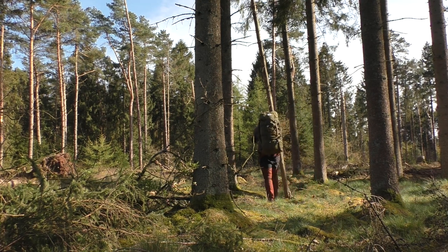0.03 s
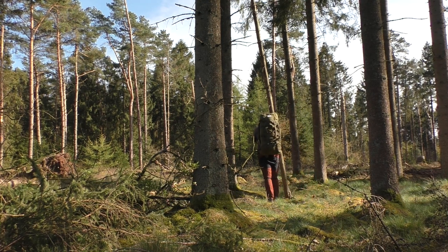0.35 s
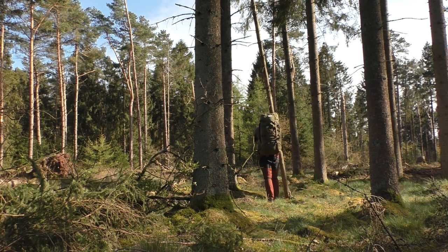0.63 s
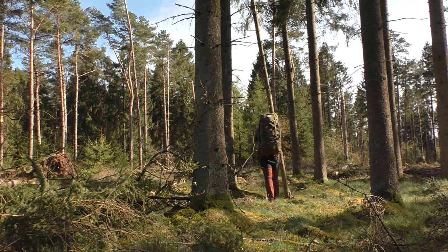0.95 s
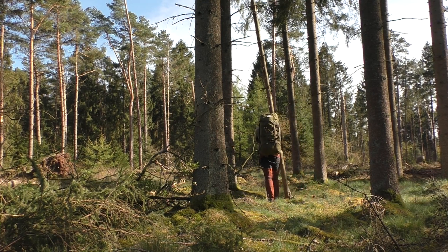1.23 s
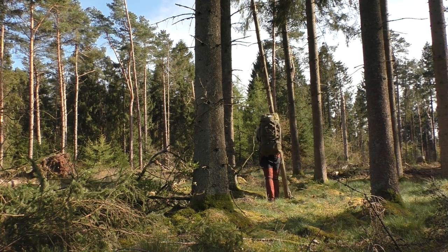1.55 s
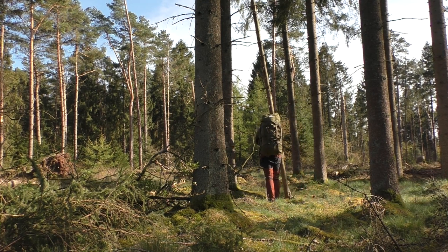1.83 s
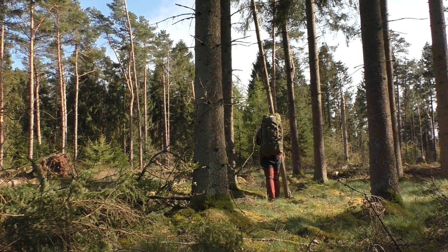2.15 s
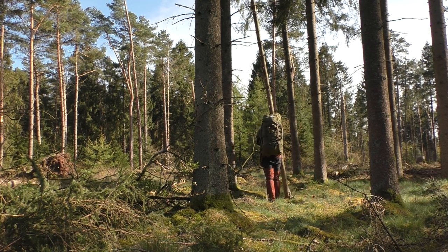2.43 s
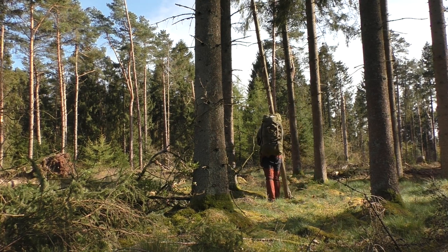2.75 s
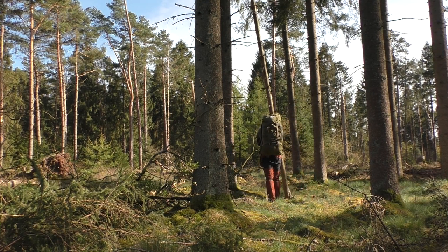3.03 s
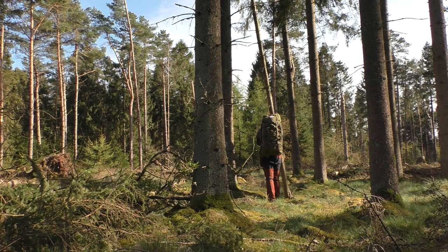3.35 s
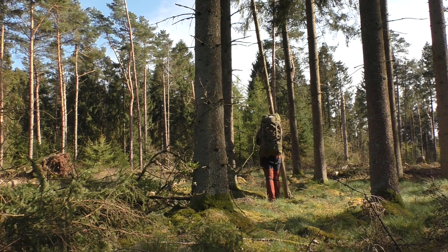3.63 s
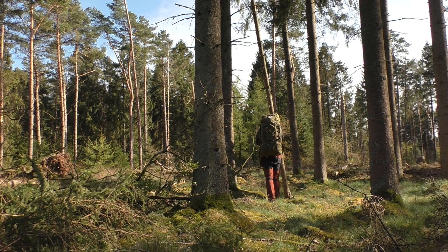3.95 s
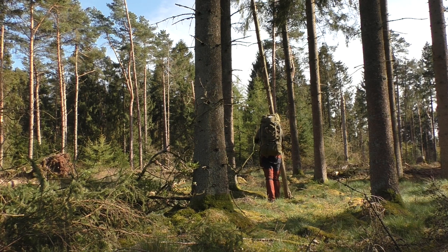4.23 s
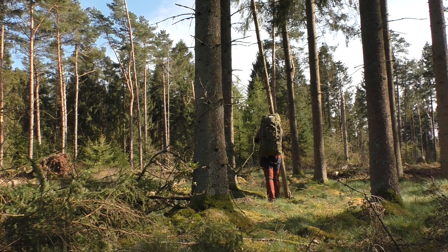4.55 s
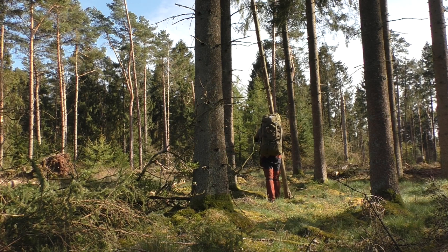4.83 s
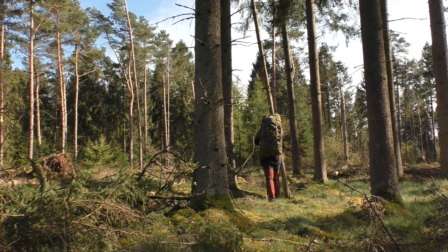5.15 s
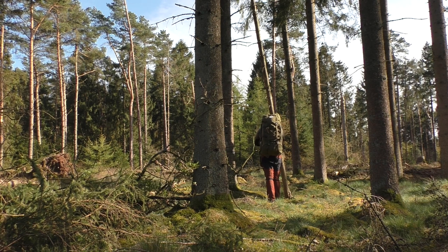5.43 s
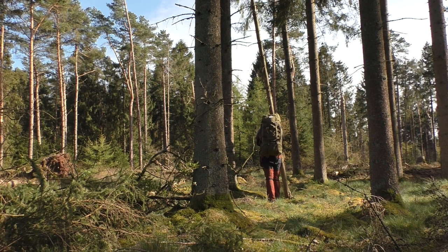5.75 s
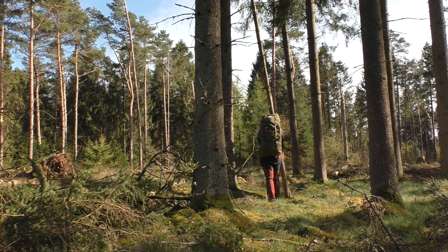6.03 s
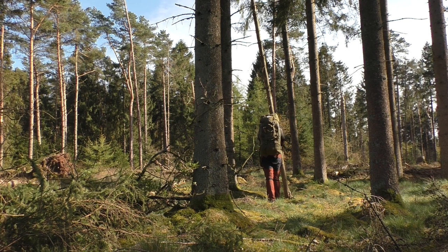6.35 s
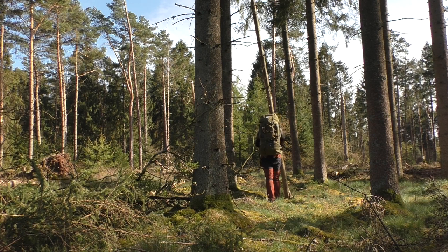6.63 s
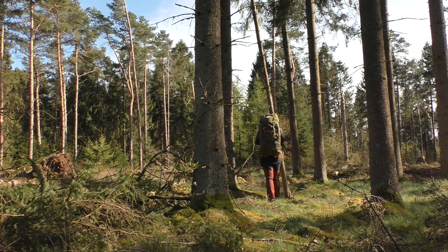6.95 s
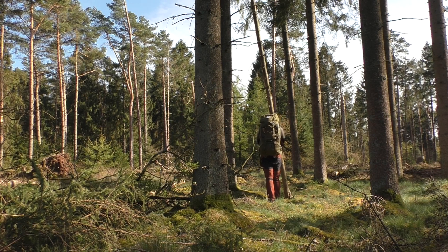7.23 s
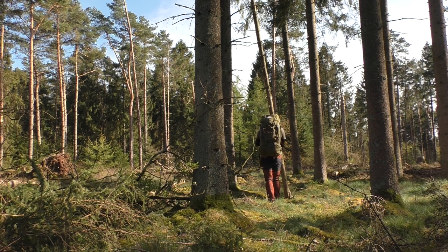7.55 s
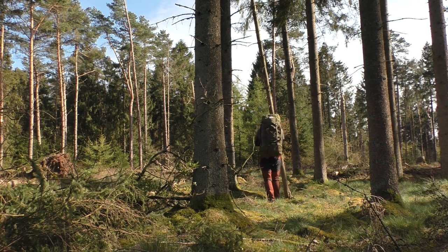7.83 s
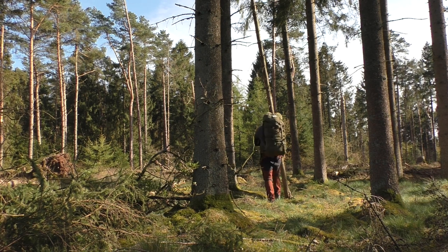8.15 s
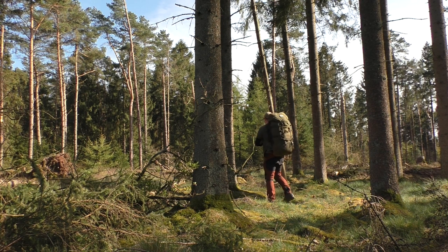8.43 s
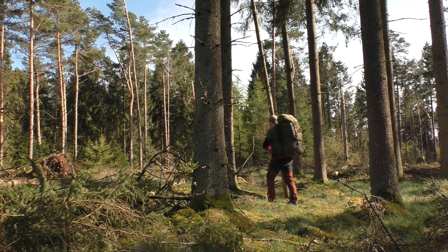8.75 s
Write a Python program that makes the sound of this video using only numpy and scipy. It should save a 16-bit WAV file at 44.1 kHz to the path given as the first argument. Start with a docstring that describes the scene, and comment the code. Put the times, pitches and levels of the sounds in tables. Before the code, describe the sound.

Light wind sighs in the treetops throughout, with low gusts rumbling on the microphone near 2 seconds and between 5.5 and 8. For the first second or so, boots crunch dry forest litter, snap twigs sharply and thud softly on moss, while small birds whistle, chirp and buzz, echoing between the trunks. The steps fade into small shifts, with a few more clear snaps around 2.5 seconds. A quiet stretch follows with thin, high calls from the treetops. Just after 4 seconds one long whistle plunges and holds its low note. Short rising whistles come between 5 and 6 seconds, then a quick run of dry bird ticks, with an occasional twig crack. From about 7.3 to 8.5 seconds a nearby bird sings a trill that steps downward. From about 8.2 seconds the hiker walks on, crunching and snapping twigs under a few chirps.

```python
"""A light wind sighs in the tops of a conifer wood and rumbles on the microphone throughout.
At the start a hiker's boots crunch dry litter, snap twigs and thud on moss, while songbirds whistle,
chirp and buzz, echoing between the trunks. The boots then only shift now and then, and thin calls come
from the treetops. Halfway, one long whistle plunges; later come a run of dry ticks and a falling trill.
At the end the hiker walks on."""
import sys
import numpy as np
from scipy import signal
from scipy.fft import rfft, irfft, next_fast_len
from scipy.io import wavfile

SR = 44100
rng = np.random.default_rng(int(sys.argv[2]) if len(sys.argv) > 2 else 0)


def dump_mix(stems):
    """Bounce the given channels to the path in sys.argv[1] as a 16-bit WAV at rate SR."""
    frames = np.atleast_2d(stems).T  # one column per channel
    limited = np.clip(frames, -1, 1)  # hard clip at full scale
    pcm = np.round(limited * 32767).astype(np.int16)
    wavfile.write(sys.argv[1], SR, pcm)


N = 392490
TIME = np.arange(N) / SR


def from_db(db):
    """Turn decibels into a number to multiply a sound by."""
    return 10 ** (np.asarray(db) / 20)


def rms_one(x):
    """Scale a signal so its average strength (rms) is 1."""
    return x / np.sqrt(np.mean(x ** 2) + 1e-20)


def add(out, start_s, sound):
    """Mix a sound in at its start time."""
    at = int(np.clip(round(start_s * SR), 0, N))
    out[at:at + len(sound)] += sound[:N - at]


def colour(x, tone):
    """Make lows and highs louder or softer, following a table of frequency_hz, level_db."""
    size = 2 * next_fast_len(N)
    hz, db = np.transpose(tone)
    bin_hz = np.arange(size // 2 + 1) * SR / size + 0.0009
    log_gain = np.log(from_db(np.interp(np.log(bin_hz), np.log(hz), db)))
    # minimum phase: the filter rings only after a sound, never before it
    cepstrum = irfft(log_gain)
    cepstrum[1:size // 2] *= 2
    cepstrum[size // 2 + 1:] = 0
    return irfft(rfft(x, size) * np.exp(rfft(cepstrum)))[:N]


def noise(tone):
    """A steady rush of strength 1 with the given tone."""
    return rms_one(colour(rng.standard_normal(N), tone))


def drift(rate_hz):
    """A smooth random wobble of strength 1 that changes about rate_hz times a second."""
    hz = np.arange(N // 2 + 1) * SR / N
    return rms_one(irfft(rfft(rng.standard_normal(N)) / (1 + (hz / rate_hz) ** 2) ** 2, N))


# tone of the wind in the treetops: frequency_hz, level_db
SIGH_TONE = [(35, -12.5), (60, -3.5), (124, -13.5), (193, -15), (281, -11), (553, -7), (1200, -17.5),
             (1340, -18), (1550, -22), (2250, -27.5), (2770, -30), (3580, -33), (3850, -33.5), (7060, -36),
             (16000, -44)]
# tone of the wind on the microphone: frequency_hz, level_db
RUMBLE_TONE = [(2, -9), (5, -6), (8, 7.5), (14, -8), (25, -15.5), (45, -18), (70, -40), (120, -42.5),
               (300, -59.5), (1000, -102)]
# gusts that swell and fade: peak_s, half_width_s, level_db
GUSTS = [(2.25, 0.47, -42), (4.55, 0.75, -49), (5.53, 0.097, -40), (5.85, 0.23, -44.5), (6.95, 0.34, -39.5),
         (8.02, 0.35, -43)]

def wind(sigh_db=-53.5, sway_db=-0.18, calm_db=-54.5, rumble_boost_db=8):
    """Air sighs through the treetops, and slow swirls press on the microphone."""
    sigh = from_db(sigh_db + sway_db * drift(6.0)) * noise(SIGH_TONE)
    power = from_db(calm_db) ** 2
    for peak_s, half_width_s, level_db in GUSTS:
        power = power + from_db(level_db) ** 2 * np.exp(-((TIME - peak_s) / half_width_s) ** 2)
    return sigh + np.sqrt(power) * from_db(rumble_boost_db) * noise(RUMBLE_TONE)


def grains(tone, per_s, spread_db, clump_db):
    """Tiny breaks of uneven size that come in clumps."""
    breaks = rng.random(N) < per_s / SR
    clumps = 2 * np.tanh(drift(76) / 2)
    clicks = breaks * rng.standard_normal(N)
    size_db = spread_db * np.minimum(rng.exponential(1, N), 4) + clump_db * clumps
    return rms_one(colour(clicks * from_db(size_db), tone))


# tone of a dull crunch: frequency_hz, level_db
CRUNCH_TONE = [(40, -2), (150, -1), (400, -10), (1000, 1), (1700, -5.5), (3000, -4), (6000, -26.5),
               (16000, -32)]
# tone of a bright crackle: frequency_hz, level_db
CRACKLE_TONE = [(500, -8.5), (1500, -6.5), (3000, -2), (5500, -2.5), (8700, -1.5), (9600, -14.5),
                (10500, -19.5), (11700, -13), (13500, -14), (16000, -23)]
# boots pressing into the litter: peak_s, settle_s, crunch_db, crackle_db
STEPS = [(0.01, 0.069, -56, -64.5), (0.251, 0.18, -51, -50), (0.632, 0.018, -57, -58.5),
         (0.8, 0.23, -59, -88), (1.21, 0.16, -61, -70), (1.9, 0.9, -68, -76.5), (2.36, 0.2, -77, -70),
         (2.535, 0.018, -74, -58), (6.33, 0.1, -69, -70), (7.262, 0.064, -59, -68), (8.24, 0.5, -61.5, -70),
         (8.663, 0.25, -54.5, -59), (8.85, 0.37, -55.5, -62)]

def litter(crunch_boost_db=2, crackle_boost_db=4, build_share=0.36):
    """Needles crunch and dry stalks crackle under the boots: each step builds quickly and dies away."""
    crunch, crackle = np.zeros(N), np.zeros(N)
    for peak_s, settle_s, crunch_db, crackle_db in STEPS:
        age = (TIME - peak_s) / settle_s
        press = np.exp(-np.maximum(age, -age / build_share))
        crunch = np.hypot(crunch, from_db(crunch_db + crunch_boost_db) * press)
        crackle = np.hypot(crackle, from_db(crackle_db + crackle_boost_db) * press)
    crunch *= grains(CRUNCH_TONE, per_s=2700, spread_db=4.5, clump_db=6.5)
    crackle *= grains(CRACKLE_TONE, per_s=5500, spread_db=3.0, clump_db=4.0)
    return crunch + crackle


def note(start_s, length_s, pitches_hz, level_db, echo_db=None, flutter_hz=0, swing_hz=0):
    """One bird note sliding through three pitches; returns start, times, pitch, loudness and echo."""
    edge_s = 0.00468  # fade in and out
    t = np.arange(int((length_s + edge_s) * SR)) / SR
    edges = np.sin(np.pi / 2 * np.clip(np.minimum(t, t[-1] - t) / edge_s, 0, 1)) ** 2
    loudness = from_db(level_db) * edges * (0.5 + 0.5 * np.sin(np.pi * t / t[-1]))
    t = t - edge_s / 2
    u = t / length_s  # 0 at the start of the note, 1 at its end
    first, middle, last = pitches_hz
    pitch = first * (1 - u) * (1 - 2 * u) + middle * 4 * u * (1 - u) + last * u * (2 * u - 1)
    if swing_hz:  # a fluttering note is loudest just after the top of each pitch swing
        flutter = 2 * np.pi * flutter_hz * t
        pitch += swing_hz * np.sin(flutter)
        loudness *= from_db(-1) * (1 + 0.5 * np.sin(flutter - 1))
    if echo_db is None:  # louder notes get a smaller share of echo
        echo_db = -2 - max(level_db + 50, 0)
    return start_s, t, pitch, loudness, echo_db


# sliding whistles: start_s, length_s, first_hz, middle_hz, last_hz, level_db, echo_db
WHISTLES = [(0.031, 0.017, 4380, 4540, 4940, -46, 2), (0.187, 0.06, 3600, 3090, 3250, -40, -7),
            (0.25, 0.021, 3025, 3640, 2870, -37, -18), (0.332, 0.022, 1600, 2150, 2960, -46.4, -6),
            (0.362, 0.0244, 2816, 3670, 2890, -33.5, -10), (0.55, 0.009, 4420, 5340, 6050, -46.5, -10),
            (0.602, 0.062, 3855, 3675, 3810, -39.5, -7.5), (0.648, 0.02, 3720, 3280, 2480, -46, -3),
            (0.726, 0.024, 2890, 2450, 2160, -56, 0), (0.759, 0.012, 2740, 3060, 3000, -44.5, -9),
            (0.8, 0.056, 5160, 5120, 5200, -56, -10), (0.831, 0.056, 3330, 3480, 3530, -41.5, -10),
            (0.962, 0.071, 3490, 3348, 2750, -43, -4), (1.069, 0.11, 2220, 2214, 2435, -47, -1),
            (1.979, 0.15, 2500, 3080, 4360, -70, -5), (3.175, 0.16, 2610, 3130, 4080, -73, -13),
            (3.68, 0.026, 4940, 5070, 5270, -66, -12), (4.611, 0.017, 3860, 3860, 2700, -56.5, 1),
            (4.833, 0.014, 5040, 6500, 6960, -58, -8), (5.088, 0.011, 6090, 7280, 7660, -65, -4),
            (5.352, 0.087, 2917, 3170, 3625, -43, -8), (5.557, 0.035, 2990, 3660, 4470, -59, 2),
            (5.586, 0.084, 4380, 4240, 4155, -53, 4), (5.854, 0.052, 2625, 3540, 4240, -59.5, 4.5),
            (5.853, 0.02, 5250, 5720, 6850, -63, -4), (5.869, 0.024, 5180, 4700, 4530, -59, 6),
            (5.897, 0.057, 4000, 4080, 4060, -46.5, -3), (6.631, 0.073, 3460, 3670, 3630, -67.5, -18),
            (6.895, 0.062, 2080, 2150, 2150, -63.5, -10), (7.037, 0.032, 3230, 3330, 3250, -63, -5),
            (7.051, 0.037, 2640, 2230, 1950, -59, 3.5), (7.225, 0.02, 4170, 4520, 4650, -55, 0),
            (7.607, 0.06, 3250, 4030, 3700, -62, -2), (7.757, 0.028, 3050, 3580, 3800, -61, -3),
            (8.619, 0.014, 4830, 4800, 5000, -46, -12), (8.637, 0.012, 3680, 3930, 4200, -44, -7),
            (8.795, 0.0084, 5000, 4060, 3660, -48, -8)]

def whistles():
    """Birds whistle single notes, each one smooth slide."""
    for start_s, length_s, *pitches_hz, level_db, echo_db in WHISTLES:
        yield note(start_s, length_s, pitches_hz, level_db, echo_db)


# snapping twigs: start_s, knock_db, crack_db, decay_s
SNAPS = [(0.0338, -39, -20.5, 0.0011), (0.124, -15, -22, 0.0019), (0.1767, -27, -13, 0.0032),
         (0.1917, -32, -14.5, 0.0023), (0.2029, -13, -7.5, 0.0022), (0.246, -27, -12, 0.0046),
         (0.2537, -2.5, -17, 0.0025), (0.2654, -7, -11.5, 0.0039), (0.302, -21, -14, 0.0005),
         (0.3653, -4, -16.5, 0.0028), (0.405, -22, -15, 0.0012), (0.4978, -27, -16, 0.0022),
         (0.623, -4, -14, 0.0013), (0.6738, -12, -17.5, 0.0019), (0.986, -29, -27, 0.0014),
         (1.0674, -25, -16, 0.0024), (1.507, -18, -31, 0.0016), (1.722, -30, -33, 0.003),
         (1.877, -42, -25, 0.0014), (2.0518, -28, -27.5, 0.0041), (2.083, -28, -28.5, 0.0033),
         (2.269, -23, -34, 0.001), (2.4193, -4.5, -21, 0.0019), (2.51, -20, -21, 0.0022),
         (2.5281, -11.5, -10.5, 0.0014), (5.4738, -20, -37, 0.0016), (6.36, -16.5, -36, 0.001),
         (6.8718, -24, -27, 0.0012), (7.2401, -15, -25.5, 0.0006), (7.496, -14, -25, 0.0011),
         (8.389, -30, -30, 0.001), (8.6216, -30, -18, 0.00099), (8.7114, -4.5, -20, 0.003),
         (8.769, -22, -17.5, 0.0018), (8.819, -2.5, -30, 0.0011), (8.8284, -7, -25, 0.0011),
         (8.8775, -6, -22, 0.0011)]

def twigs(crack_boost_db=1, knock_cut_db=2.5, splinter_db=-19, splinter_s=0.018):
    """A twig breaks with a bright crack, a duller knock and a brief spray of splinters."""
    cracks, knocks = np.zeros(N), np.zeros(N)
    t = np.arange(SR // 10) / SR
    for start_s, knock_db, crack_db, decay_s in SNAPS:
        # fibres part one after another, ever more weakly
        fibres = rng.standard_normal(len(t)) * (rng.random(len(t)) < 0.4)
        fibres *= np.exp(-t / decay_s) + from_db(splinter_db) * np.exp(-t / splinter_s)
        fibres[0] = 0.54  # the first break
        fibres /= np.sqrt(np.sum(fibres ** 2))
        add(cracks, start_s, from_db(crack_db + crack_boost_db) * fibres)
        add(knocks, start_s, from_db(knock_db - knock_cut_db) * fibres)
    return colour(cracks, CRACKLE_TONE) + colour(knocks, CRUNCH_TONE)


# pointed chirps: top_s, rise_s, fall_s, top_hz, level_db
CHIRPS = [(0.065, 0.012, 0.015, 4520, -42), (0.114, 0.023, 0.016, 4475, -42),
          (8.653, 0.012, 0.019, 4740, -40), (8.702, 0.019, 0.0208, 4570, -40.5),
          (8.846, 0.026, 0.017, 3910, -44)]

def chirps(rise_hz_per_s=72000, fall_hz_per_s=98000, sag_hz=196):
    """A bird sweeps up to a point and down again, along two slightly sagging slopes."""
    for top_s, rise_s, fall_s, top_hz, level_db in CHIRPS:
        first_hz = top_hz - rise_hz_per_s * rise_s
        last_hz = top_hz - fall_hz_per_s * fall_s
        yield note(top_s - rise_s, rise_s, (first_hz, (first_hz + top_hz) / 2 - sag_hz, top_hz), level_db)
        yield note(top_s, fall_s, (top_hz, (top_hz + last_hz) / 2 - sag_hz, last_hz), level_db)


# heel and sole landing on soft ground: start_s, level_db, pitch_hz
THUDS = [(0.186, -43, 84.5), (0.257, -43, 85.5), (0.299, -51, 170), (0.354, -43, 65), (0.395, -47, 151),
         (8.65, -42.5, 69.5)]

def thuds(cycles_to_peak=0.66):
    """Mossy ground gives a low push that dies within a few cycles."""
    out, t = np.zeros(N), np.arange(SR // 5) / SR
    for start_s, level_db, pitch_hz in THUDS:
        age = pitch_hz * t / cycles_to_peak
        push = age ** 2 * np.exp(2 - 2 * age)
        add(out, start_s, from_db(level_db) * push * np.sin(2 * np.pi * pitch_hz * t))
    return out


# buzzed notes: start_s, length_s, first_hz, middle_hz, last_hz, level_db, flutter_hz, swing_hz
BUZZES = [(0.377, 0.14, 4020, 3900, 3690, -51, 53, 99), (0.456, 0.057, 3670, 3470, 3360, -46.5, 55, 151),
          (0.658, 0.16, 4020, 4080, 3820, -53.5, 38.2, 79), (0.773, 0.11, 3450, 3970, 4090, -39, 200, 340),
          (0.871, 0.115, 4080, 4210, 4100, -43, 196, 360),
          (5.275, 0.057, 3650, 3635, 3850, -52.5, 150, 262),
          (8.04, 0.028, 3620, 3850, 4050, -50.5, 206, 170)]

def buzzes():
    """A bird's whistle flutters so fast that it buzzes."""
    for start_s, length_s, *pitches_hz, level_db, flutter_hz, swing_hz in BUZZES:
        yield note(start_s, length_s, pitches_hz, level_db, flutter_hz=flutter_hz, swing_hz=swing_hz)


def syllables(shape, repeats):
    """A bird repeats a syllable: a short group of notes, each smooth or buzzed."""
    for start_s, level_db in repeats:
        for delay_s, length_s, *pitches_hz, boost_db, swing_hz in shape:
            yield note(start_s + delay_s, length_s, pitches_hz, level_db + boost_db,
                       flutter_hz=199, swing_hz=swing_hz)


# notes of a twitter: delay_s, length_s, first_hz, middle_hz, last_hz, boost_db, swing_hz
TWITTER = [(0, 0.0058, 5850, 5240, 6000, 1, 0), (0.0095, 0.01, 5230, 4750, 5670, 1, 0)]
# when it is sung: start_s, level_db
TWITTER_REPEATS = [(0.485, -42), (0.568, -42.5)]

def twitter():
    """A bird sings a pair of tiny high notes, twice."""
    return syllables(TWITTER, TWITTER_REPEATS)


# calls from the treetops: start_s, length_s, pitch_hz, level_db
THIN_CALLS = [(0.935, 0.02, 6660, -62), (1.254, 0.026, 7000, -64), (1.83, 0.042, 7950, -63),
              (1.9, 0.087, 7650, -67), (2.438, 0.078, 7550, -71), (3.843, 0.042, 5940, -61.5),
              (3.985, 0.053, 7350, -72), (4.625, 0.045, 8010, -66.5), (4.671, 0.045, 7460, -69),
              (4.725, 0.038, 7450, -63.5), (4.764, 0.04, 7450, -66), (4.846, 0.02, 5900, -50),
              (5.095, 0.035, 7140, -58.5), (6.84, 0.023, 6940, -67), (7.16, 0.025, 6900, -69)]

def thin_calls(droop_share=0.0463):
    """Thin, high calls quaver as they droop from just above their pitch to just below it."""
    for start_s, length_s, pitch_hz, level_db in THIN_CALLS:
        pitches_hz = (pitch_hz * (1 + droop_share), pitch_hz, pitch_hz * (1 - droop_share))
        yield note(start_s, length_s, pitches_hz, level_db, echo_db=-3, flutter_hz=129, swing_hz=70)


# points along one long whistle: time_s, pitch_hz, level_db
PLUNGE = [(4.118, 6200, -65), (4.16, 6330, -69), (4.171, 5500, -50), (4.181, 5280, -61), (4.186, 5450, -73),
          (4.2, 4700, -56), (4.221, 4550, -62), (4.232, 4020, -45.5), (4.248, 3850, -53),
          (4.253, 3310, -61), (4.263, 2650, -45.5), (4.285, 2400, -49), (4.32, 2210, -54),
          (4.53, 2214, -52), (4.58, 2270, -58)]

def plunge(low_echo_db=-10, high_echo_db=1):
    """A whistle drops in steps and holds its low note; it echoes most while it is high."""
    time_s, pitch_hz, level_db = np.transpose(PLUNGE)
    t = TIME[(TIME >= time_s[0]) & (TIME <= time_s[-1])]
    pitch = np.interp(t, time_s, pitch_hz)
    loudness = from_db(np.interp(t, time_s, level_db)) * signal.windows.tukey(len(t), 0.05)
    echo_db = np.interp(pitch, [pitch_hz.min(), 2 * pitch_hz.min()], [low_echo_db, high_echo_db])
    yield t[0], t - t[0], pitch, loudness, echo_db


# a run of dry ticks: start_s, level_db
TICKS = [(6.201, -54.5), (6.249, -57.5), (6.261, -54), (6.289, -56), (6.315, -54), (6.359, -53)]

def ticks(length_s=0.0054, pitches_hz=(2830, 2470, 2240)):
    """A bird's falling notes are so short that they sound like ticks."""
    for start_s, level_db in TICKS:
        yield note(start_s, length_s, pitches_hz, level_db)


# notes of the trill's syllables: delay_s, length_s, first_hz, middle_hz, last_hz, boost_db, swing_hz
HIGH_SYLLABLE = [(0.003, 0.032, 5950, 5800, 5820, -16.5, 380), (0.049, 0.0163, 6160, 4860, 4700, -15.5, 0),
                 (0.069, 0.0083, 4830, 5500, 6050, -22, 0), (0.077, 0.008, 5830, 4250, 3880, -5.5, 0),
                 (0.08, 0.018, 4350, 4540, 4350, 0.5, 0)]
MIDDLE_SYLLABLE = [(0, 0.023, 5550, 5080, 4630, -17, 330), (0.032, 0.0208, 4470, 4030, 3540, -1, 0),
                   (0.058, 0.014, 3700, 3930, 3870, -5, 0)]
LOW_SYLLABLE = [(0, 0.038, 3880, 3760, 3210, -4.5, 170), (0.037, 0.024, 3000, 2634, 2160, -0.5, 0),
                (0.075, 0.028, 1920, 2900, 2980, -2.5, 0)]
# when each is sung: start_s, level_db
HIGH_REPEATS = [(7.302, -47), (7.462, -35), (7.624, -35)]
MIDDLE_REPEATS = [(7.781, -35), (7.901, -40.5)]
LOW_REPEATS = [(8.119, -42.5), (8.282, -42.5), (8.443, -41.5)]

def trill():
    """The near bird steps down through three syllables, repeating each."""
    yield from syllables(HIGH_SYLLABLE, HIGH_REPEATS)
    yield from syllables(MIDDLE_SYLLABLE, MIDDLE_REPEATS)
    yield from syllables(LOW_SYLLABLE, LOW_REPEATS)


def birds(waver_share=0.0098, shimmer_db=2.5):
    """A bird's voice box gives an almost pure tone; returns the song and the part sent among the trees."""
    song, sent = np.zeros(N), np.zeros(N)
    waver = 1 + waver_share * drift(172)
    for call in (whistles, chirps, buzzes, twitter, thin_calls, plunge, ticks, trill):
        for start_s, t, pitch, loudness, echo_db in call():
            unsteady_pitch = pitch * np.interp(start_s + t, TIME, waver)
            tone = loudness * np.sin(2 * np.pi * np.cumsum(unsteady_pitch) / SR)
            add(song, start_s + t[0], tone)
            add(sent, start_s + t[0], tone * from_db(echo_db))
    return song * from_db(shimmer_db * drift(100)), sent


# tone of what the trunks send back: frequency_hz, level_db
ECHO_TONE = [(1000, -17.5), (2200, -2), (3500, 1.5), (4500, -4.5), (6000, -8), (9000, -1)]

def forest_echo(sound, far_fade_s=1.49, near_fade_s=0.11, near_db=4, build_s=0.0028, blur_rad=0.93):
    """Echoes from near trunks die fast, those from deep in the wood slowly."""
    t = np.arange(2 * SR) / SR
    decay = from_db(-60 * t / far_fade_s) + from_db(near_db - 60 * t / near_fade_s)
    bounces = rng.standard_normal(len(t)) * decay * (1 - np.exp(-t / build_s))
    bounces /= np.sqrt(np.sum(bounces ** 2))
    echo = colour(signal.fftconvolve(sound, bounces)[:N], ECHO_TONE)
    # the echo's phase wanders, so held tones blur as they die
    return np.real(signal.hilbert(echo) * np.exp(1j * blur_rad * drift(110)))


def scene(step_echo_db=-13, song_echo_db=-24):
    """Birds, twigs and litter share the echo of the wood; thuds and wind have none."""
    song, sent = birds()
    steps = twigs() + litter()
    echo = forest_echo(sent + from_db(song_echo_db) * song + from_db(step_echo_db) * steps)
    return (song + steps + thuds() + echo + wind())[None]


def record(dry, cutoff_hz=15900):
    """The very highest treble is cut off steeply."""
    return signal.sosfilt(signal.ellip(12, 0.1, 80, cutoff_hz, fs=SR, output="sos"), dry)


dry = scene()
out = record(dry)
dump_mix(out)
```